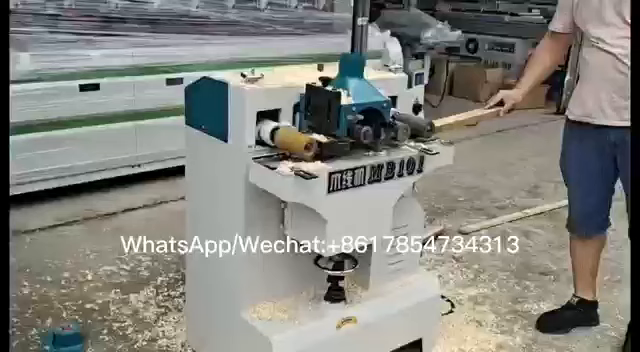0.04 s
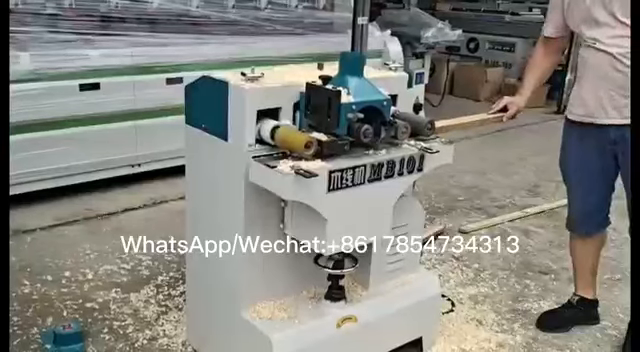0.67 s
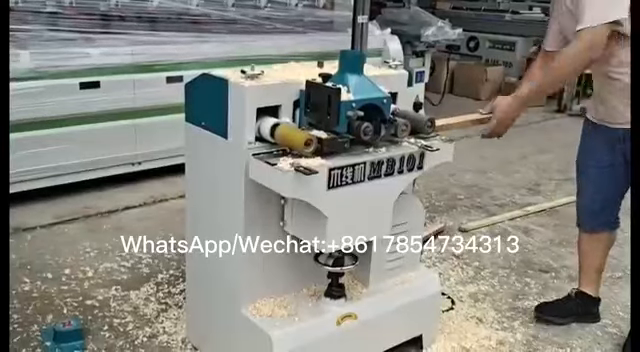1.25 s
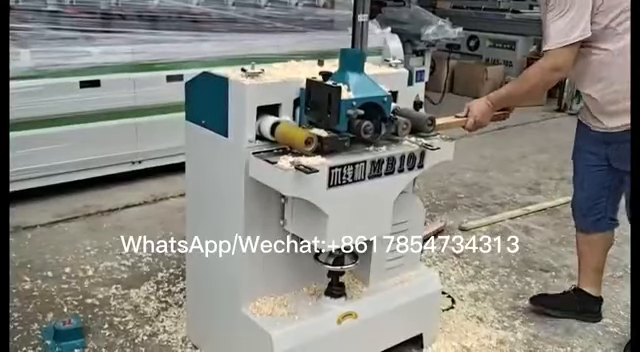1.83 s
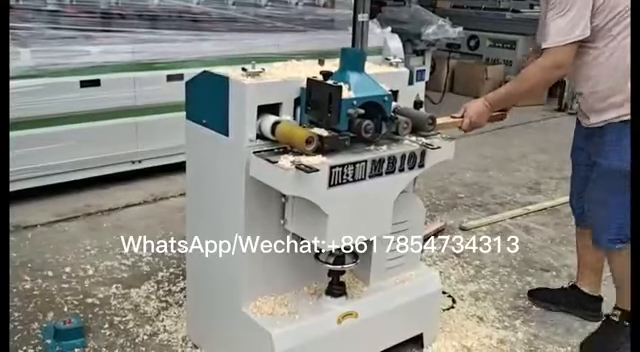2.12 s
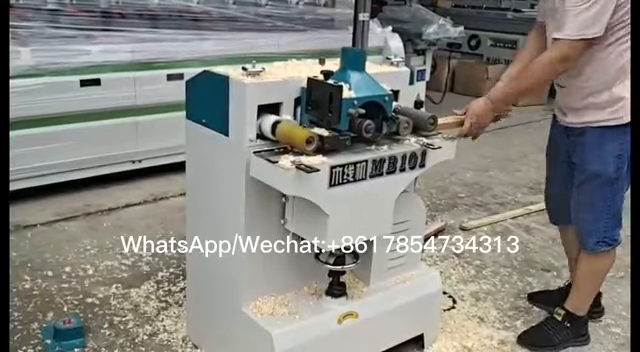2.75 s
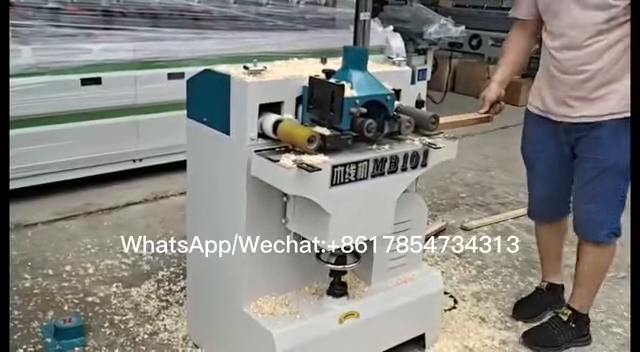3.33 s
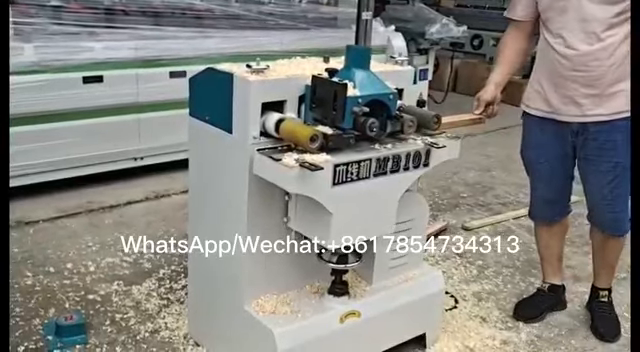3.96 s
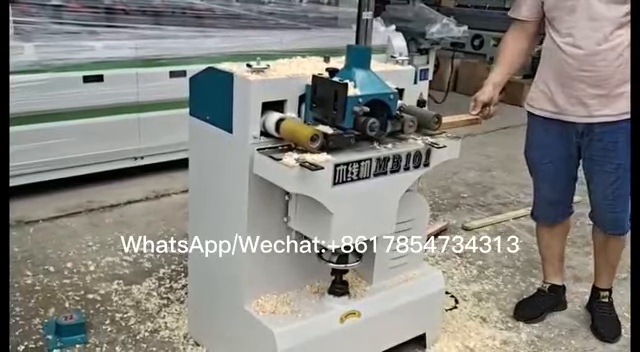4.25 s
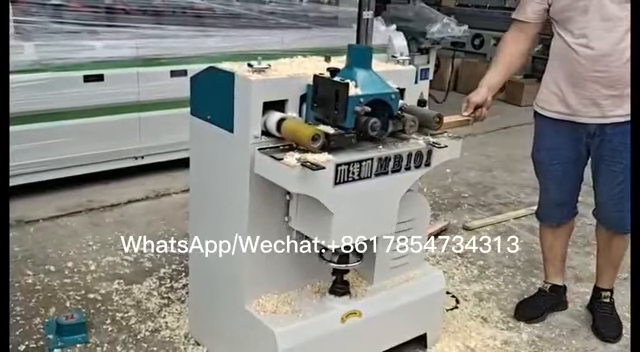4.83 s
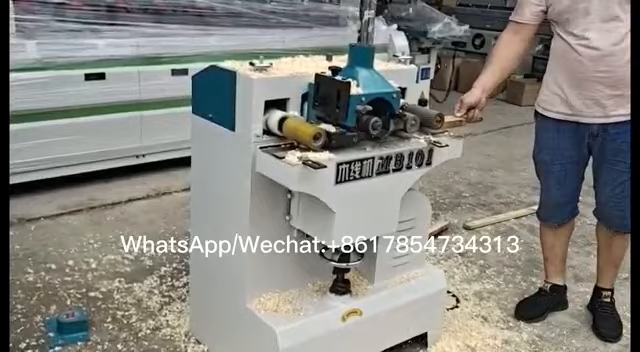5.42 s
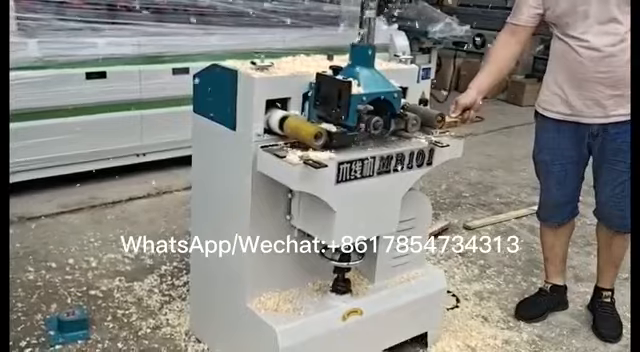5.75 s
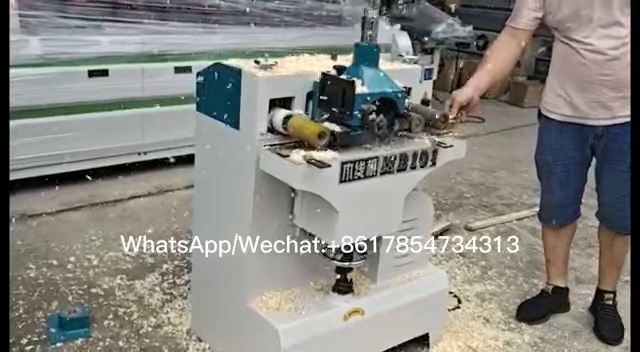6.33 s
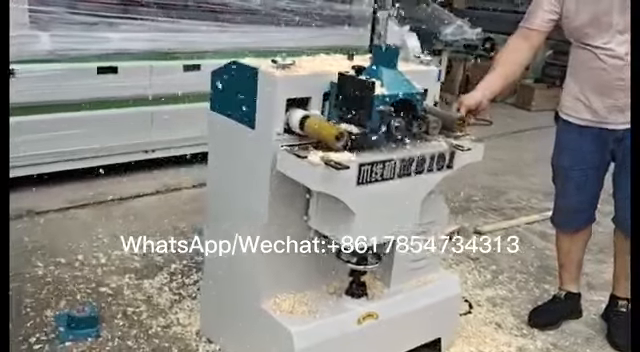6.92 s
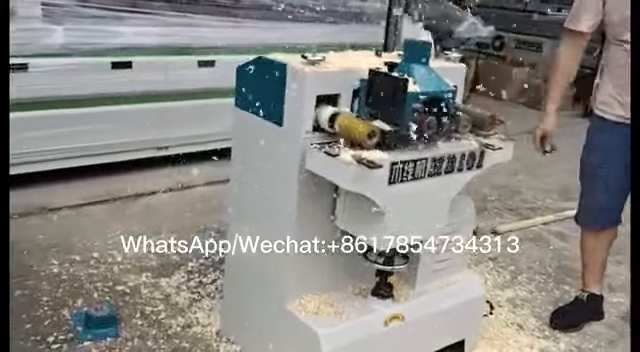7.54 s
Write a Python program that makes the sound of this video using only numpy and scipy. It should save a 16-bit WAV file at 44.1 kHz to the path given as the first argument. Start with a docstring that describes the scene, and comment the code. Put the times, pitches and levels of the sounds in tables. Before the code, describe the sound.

A wood planer idles with a siren-like hum, then squeals and whines roughly as a wooden strip is cut, chips hissing.

```python
"""Wood planer taking a cut

A four-knife planer idles in a workshop, its cutter block chopping the air into a siren hum over
motor fan, bearings and rushing air. At about five seconds a wooden strip meets the knives: a short
squeal, the shaft sags, and the cut settles to a rough whine with hissing, pattering chips."""
import sys
import numpy as np
from scipy import signal
from scipy.fft import rfft, irfft
from scipy.io import wavfile
from scipy.ndimage import uniform_filter1d

SR = 44100
rng = np.random.default_rng(int(sys.argv[2]) if len(sys.argv) > 2 else 0)


def wav_out(sig):
    """Save sig, one row per channel (or a flat mono array), as 16-bit PCM at SR to the path in sys.argv[1]."""
    wavfile.write(sys.argv[1], SR, np.round(np.clip(np.atleast_2d(sig).T, -1, 1) * 32767).astype(np.int16))


N = 338688
T = np.arange(N) / SR

# cutter shaft, sagging under load: t/s, speed/(turns/s)
SHAFT_SPEED = [(0, 104.13), (4.98, 104.13), (5.16, 102.9), (5.4, 102.12), (5.7, 101.88), (6.4, 102.0)]
# rides for the knife-pass hum and its octave, which honks as the full cut begins: t/s, level/dB
HUM_RIDE = [(.4, -32), (4.1, -30), (4.85, -35), (5.4, -29.5), (5.95, -30), (6.45, -36), (6.97, -26.5),
            (7.3, -30.5), (7.66, -37.5)]
OCTAVE_RIDE = [(.3, -41.5), (1.8, -36.5), (2.6, -38.5), (4.33, -34.5), (4.8, -42.5), (4.96, -34.5),
               (5.03, -50), (5.15, -35.5), (5.3, -37), (5.48, -24), (5.68, -38.5), (5.85, -30.5),
               (7.65, -32)]
# rides for the fan tone, which sinks under load, and for the rumble: t/s, level/dB
FAN_RIDE = [(.5, -41), (1.75, -40), (2.45, -35.5), (4.4, -34.5), (5.15, -39.5)]
RUMBLE_RIDE = [(.3, -44.5), (.65, -44), (2.2, -42.5), (3.0, -40.5), (3.9, -40), (4.85, -39.5),
               (5.35, -44.5), (5.75, -40.5), (6.05, -45), (6.3, -42), (7.6, -43.5)]
# faint tones of motor, belt and bearings: f/Hz, settled level/dB, width/Hz
WHIRR_TONES = [(104.4, -57.5, 2.5), (168.4, -44.5, 10), (224, -58, 8.9), (303.8, -51.5, 27),
               (1240, -56.5, 1.6), (1402, -60, 16), (1468, -59.5, 12), (1680, -61.5, 2.5),
               (1851, -58.5, 48), (3720, -59, 49), (4065, -58, 110), (7470, -60, 48)]
# resonances the strip catches: t/s, length/s, f/Hz, level/dB
STRIP_RESONANCES = [(4.842, 0.13, 2915, -46), (5.05, 0.15, 1240, -35), (5.066, 0.28, 308, -36),
                    (5.336, 0.19, 1633, -33), (5.593, 0.21, 918, -32.5), (5.898, 0.098, 306, -34),
                    (5.92, 0.21, 918, -40), (6.847, 0.75, 306, -44), (6.917, 0.96, 918, -40.5),
                    (7.295, 0.23, 918, -33), (7.618, 0.11, 306, -26.5)]
# partials of the squeal: shaft order, relative level at first touch/dB, once dug in/dB
SQUEAL_PARTIALS = [(6, -58, -48), (10, -56, -39), (11, -52, -39), (12, -50, -44), (13, -54, -42),
                   (16, -51, -37.5), (20, -39.5, -33.5), (22, -41, -52), (24, -45, -39), (28, -32, -31.5),
                   (32, -36, -30.5), (36, -47, -40), (40, -37.5, -32), (44, -36, -37), (48, -44, -31.5),
                   (52, -46, -36.5), (56, -44, -43), (60, -45, -46), (64, -49, -41.5), (68, -41.5, -45),
                   (72, -46, -35.5), (76, -43, -42), (80, -57, -44), (84, -49, -45), (88, -55, -47),
                   (92, -55, -52)]
# partials that stand out of the whine: shaft order, relative level early in the feed/dB, late/dB
WHINE_PARTIALS = [(6, -50, -51), (10, -39, -42), (12, -41, -39), (13, -44, -52), (14, -51, -42),
                  (15, -58, -50), (16, -38, -45), (17, -50, -50), (18, -45, -57), (21, -54, -70),
                  (22, -53, -75), (24, -50, -44), (25, -54, -47), (26, -65, -50), (27, -50, -45),
                  (28, -42.5, -44), (30, -58, -68), (31, -55, -49), (32, -52, -48), (33, -53, -49),
                  (34, -43, -45), (36, -44, -40), (38, -52, -48), (41, -49, -52), (48, -50, -50),
                  (52, -51, -53)]
# larger chips striking the hood: t/s, relative level/dB
HOOD_HITS = [(5.539, -18), (5.5863, -18.5), (5.699, -20), (5.8916, -21), (7.281, -21), (7.431, -21),
             (7.505, -23)]
# EQ curves of the noise layers; the late rasp is hollow near 2200 Hz: f/Hz, relative level/dB
AIR_EQ = [(100, -37), (220, 0.5), (290, -1.5), (420, 7.5), (570, -6), (800, 2), (1050, 1), (1450, -10.5),
          (2050, -16.5), (3000, -12.5), (5000, -14.5), (6100, -21), (7600, -23.5), (8300, -40.5)]
RUMBLE_EQ = [(20, -40), (40, -30), (80, -22), (105, -7.5), (135, 2), (168, -6.5), (195, -10.5),
             (300, -31.5), (600, -71.5)]
CHIP_EQ = [(3000, -22), (4100, 2), (5200, 2.5), (5900, -1), (6700, 2.5), (7350, 7.5), (7750, -1),
           (8100, -11), (9000, -10.5), (9500, -30)]
EARLY_RASP_EQ = [(1000, -17), (1600, 5), (1900, 2), (2150, 2), (2600, 5), (3500, 6.5), (4000, 0),
                 (5000, -42)]
LATE_RASP_EQ = [(1000, -19.5), (1600, 8), (1950, -3.5), (2200, -26.5), (2480, 9.5), (2800, 5.5), (3050, -3),
                (3450, 10.5), (4000, 2), (5000, -31)]
WOOD_EQ = [(150, -32), (300, -8.5), (600, -3), (900, 5.5), (1300, 1.5), (1800, -2), (2400, -47.5)]
# how alike left and right are: f/Hz, correlation (0-1)
STEREO_LIKENESS = [(25, .99), (60, .9998), (205, .9998), (260, .995), (320, .975), (400, .997), (460, .995),
                   (590, .68), (720, .92), (820, .985), (1000, .95), (1400, .55), (2100, .76), (3800, .55),
                   (4500, .33), (6100, .35), (6500, .78), (7400, .82), (8000, .05)]
# pan across the spectrum: f/Hz, level of left over right/dB
STEREO_PAN = [(450, 0), (600, 1.5), (800, .5), (1050, .3), (1400, 5), (2000, 0), (3200, -3), (4400, -.7),
              (6100, -7), (6700, -5), (7200, -2.5), (7900, .5)]
# how far left leads right: f/Hz, phase/rad
STEREO_LEAD = [(2400, 0), (3600, .55), (4000, .2), (4400, .9), (4900, .4), (5400, 1.1), (6000, 0)]

START_S = .163  # the sound opens
CONTACT_S, GRAZE_END_S = 4.912, 5.416  # the strip grazes the knives, then slides into the full cut
LATE_S = 6.84  # the strip's ring shifts and the cut grows louder


def amp(db):
    """Decibels to gain."""
    return 10 ** (np.asarray(db) / 20)


def unit(x):
    """Scales to rms 1."""
    return x / np.sqrt(np.mean(abs(x) ** 2) + 1e-20)


def ramp(start_s, length_s):
    """A straight fade from 0 to 1."""
    return np.clip((T - start_s) / length_s, 0, 1)


def rise(start_s, time_s):
    """An exponential attack from 0 towards 1."""
    return 1 - np.exp(-np.maximum(T - start_s, 0) / time_s)


def held(start_s, length_s, edge_s):
    """Attack, hold and release."""
    attack_s = start_s - edge_s / 2
    return ramp(attack_s, edge_s) * (1 - ramp(attack_s + length_s, edge_s))


def automation(points):
    """A timed table as a control signal."""
    return np.interp(T, *np.transpose(points))


def spectrum(points, hz):
    """Reads a table on a log-frequency axis."""
    f, value = np.transpose(points)
    return np.interp(np.log(hz + 1), np.log(f), value)


def drift(hz):
    """Smooth random wander of rms about 1, rolling off above hz."""
    size, control_rate = 4096, 500
    f = np.fft.rfftfreq(size, 1 / control_rate)
    slow = unit(irfft(rfft(rng.standard_normal(size)) / (1 + (f / hz) ** 2)))
    return np.interp(T, np.arange(size) / control_rate, slow)


def noise():
    """White noise, unrelated left and right."""
    return rng.standard_normal((2, N))


def colour(x, eq):
    """Shapes x with an EQ curve; rms 1."""
    gain = amp(spectrum(eq, np.fft.rfftfreq(N, 1 / SR)))
    return unit(irfft(rfft(x) * gain, N))


def patchy(x, depth_db):
    """Shifts a noise's colour in patches a few hundred hertz wide and a tenth of a second long."""
    frames = signal.stft(x, nperseg=1024)[2]
    patches = rng.standard_normal(frames.shape[1:])
    for _ in range(2):
        patches = uniform_filter1d(uniform_filter1d(patches, size=4, axis=0), size=8, axis=1)
    return unit(signal.istft(frames * amp(depth_db * unit(patches)))[1][:, :N])


def tone(cycles, rough, width_hz):
    """A part steady, part wandering tone of rms 1, its two channels a quarter cycle apart."""
    wander = rough * (drift(width_hz) + 1j * drift(width_hz)) / np.sqrt(2)
    carrier = np.exp(2j * np.pi * (cycles + rng.random())) * np.sqrt(2 / (1 + rough ** 2))
    left = (carrier * (1 + wander)).real
    right = rng.choice([-1, 1]) * (carrier * (1 + wander.conj())).imag
    return np.array([left, right])


def cutter_siren(turns):
    """Four knives chop the air into a hum and its octave."""
    hum = amp(automation(HUM_RIDE)) * tone(4 * turns, rough=.013, width_hz=15)
    octave = amp(automation(OCTAVE_RIDE)) * tone(8 * turns, rough=.2, width_hz=5)
    return hum + octave


def motor_fan(hz=372.4):
    """The fan's tone sits just below the knife hum and beats against it."""
    return amp(automation(FAN_RIDE)) * tone(hz * T, rough=.25, width_hz=7)


def drive_whirr():
    """Motor, belt and bearings add a bed of faint, wavering tones."""
    return sum(amp(db) * tone(hz * T, rough=1.12, width_hz=width / 2) for hz, db, width in WHIRR_TONES)


def air_rush():
    """Air rushes through the machine with a light flutter."""
    fluttering = patchy(noise(), depth_db=1.5) * amp(drift(40))
    return colour(fluttering, AIR_EQ) * amp(-35)


def frame_rumble():
    """Motor and frame rumble unsteadily in the low end."""
    return colour(noise(), RUMBLE_EQ) * amp(automation(RUMBLE_RIDE) + 1.3 * drift(7))


def strip_howls(turns, likeness=.75):
    """The strip catches a resonance and growls or howls briefly on the nearest shaft order."""
    speed = automation(SHAFT_SPEED)
    howls = 0
    for start_s, length_s, hz, db in STRIP_RESONANCES:
        order = np.round(hz / np.interp(start_s, T, speed))
        envelope = amp(db) * held(start_s, length_s, edge_s=.051)
        howls += envelope * tone(order * turns, rough=.58, width_hz=12)
    left, other = howls
    return np.array([left, likeness * left + np.sqrt(1 - likeness ** 2) * other])


def graze_squeal(turns):
    """Knives graze the strip's end: a thin scream fills out as they dig in, then dies treble first."""
    dug_in = ramp(5.02, .22)
    chatter = turns + dug_in * .001 * drift(70)  # the strip shakes, so the blows land unevenly
    scream = 0
    for order, touch_db, dug_db in SQUEAL_PARTIALS:
        khz = order * SHAFT_SPEED[-1][1] / 1000
        release = 1 - ramp(5.43 - .014 * khz, .11)
        level = amp(touch_db) * (1 - dug_in) + amp(dug_db) * dug_in
        scream += level * release * tone(order * chatter, rough=.5, width_hz=26 + .3 * order)
    return scream * amp(.4) * rise(CONTACT_S, .022)


def workshop_echo(x, wet_db=-10, t60_s=.5, reflections_per_s=2000):
    """The shop holds on to the pitch of a moment ago, so falling partials broaden and beat."""
    reflections = noise() * (rng.random((2, N)) < reflections_per_s / SR)
    tail = reflections * (T > .004) * amp(-60 * T / t60_s)
    echo = signal.fftconvolve(x, unit(tail) / np.sqrt(N), axes=1)[:, :N]
    return (x + amp(wet_db) * echo) / np.hypot(1, amp(wet_db))


def tearing(turn_likeness):
    """Each turn tears the wood much like the last: noise combed at the loaded shaft rate."""
    one_turn_delay = np.exp(-2j * np.pi * np.fft.rfftfreq(N, 1 / SR) / SHAFT_SPEED[-1][1])
    return irfft(rfft(noise()) / (1 - turn_likeness * one_turn_delay), N)


def knife_pulses(turns):
    """Four unequal knives make the level pulse four times a turn."""
    angle = 2 * np.pi * turns
    return 1 + .1 * np.cos(4 * angle) + .08 * np.cos(2 * angle) + .07 * np.cos(angle)


def chip_hiss(turns, graze, late, chips_per_s=250):
    """Fine spray hisses off the knives and loose chips patter on the hood; grazing throws fewer."""
    spray = patchy(tearing(turn_likeness=.54), depth_db=2) * knife_pulses(turns) * amp(1.6 * drift(40))
    impacts = (rng.random((2, N)) < chips_per_s / SR) * noise()
    patter = impacts * amp(3 * np.minimum(rng.exponential(1, (2, N)), 3))
    first_chips = held(5.42, .22, edge_s=.16)  # thickest as the full cut begins
    level_db = -37 - 4.5 * graze + 3.5 * first_chips + late
    return colour(spray + .55 * unit(patter), CHIP_EQ) * amp(level_db) * rise(CONTACT_S, .036)


def cut_whine(turns, late, ease):
    """Unequal bites sound every shaft order; as the cut eases, the knife-pass harmonics dip least."""
    prominent = {order: levels for order, *levels in WHINE_PARTIALS}
    whine = 0
    for order in range(6, 54):
        early_db, late_db = prominent.get(order, (-59, -59))
        level = amp(early_db) * (1 - late) + amp(late_db) * late
        dip_db = -1.5 if order % 4 == 0 else -7
        dip = 1 + ease * (amp(dip_db) - 1)
        whine += level * dip * tone(order * turns, rough=.26, width_hz=2 + .2 * order)
    return whine * amp(-1.1)


def fibre_rasp(turns, late, ease):
    """Fibres tear at each knife: fierce at the first bite, settling, then swelling late in the feed."""
    fibres = patchy(tearing(turn_likeness=.66), depth_db=2) * knife_pulses(turns)
    fibres *= amp(drift(35))  # hard and soft wood passes under the knives
    rasp = colour(fibres, EARLY_RASP_EQ) * (1 - late) + colour(fibres, LATE_RASP_EQ) * late
    bite = held(5.03, .12, edge_s=.036)
    scraping = 1 - ramp(GRAZE_END_S, .37)
    swell = ramp(LATE_S, .88)
    return rasp * amp(-36.5 + 3.5 * bite + 5 * scraping - 3.5 * ease + 5.5 * swell)


def wood_body(graze):
    """The body of the strip fills in the mids just after contact, loudest while the knives graze."""
    body = colour(tearing(turn_likeness=.45), WOOD_EQ)
    return body * amp(-37.5 + 4 * graze) * rise(CONTACT_S + .14, .051)


def hood_ticks(decay_s=.0066):
    """Larger chips hit the hood, each a short, bright crack."""
    envelope = sum(amp(db - 7) * (T >= s) * (1 - rise(s, decay_s)) for s, db in HOOD_HITS)
    return colour(noise(), CHIP_EQ) * envelope


def stereo_image(pair):
    """Near mono in the bass, wider and leaning right in the treble."""
    hz = np.fft.rfftfreq(N, 1 / SR)
    likeness = spectrum(STEREO_LIKENESS, hz)
    pan = amp(spectrum(STEREO_PAN, hz) / 2)
    lead = spectrum(STEREO_LEAD, hz)
    left, other = rfft(pair)
    right = (likeness * left + np.sqrt(1 - likeness ** 2) * other) * np.exp(-1j * lead)
    mono_gain = np.sqrt(pan ** 2 + pan ** -2 + 2 * likeness * np.cos(lead)) / 2
    return irfft(np.array([left * pan, right / pan]) / mono_gain, N)


def scene():
    """The idling machine with the cut layered on top; under load the shaft speed trembles."""
    load = rise(CONTACT_S + .053, .047)
    turns = np.cumsum(automation(SHAFT_SPEED) + .1 * load * drift(6)) / SR
    graze = 1 - ramp(GRAZE_END_S, .062)
    ease = held(5.62, .273, edge_s=.044)  # the cut lets up briefly after the bite
    late = ramp(LATE_S, .1)
    opening_swell = amp(-4.5 * (1 - rise(START_S, 1.6)))
    machine = cutter_siren(turns) + motor_fan()
    machine += (drive_whirr() + air_rush()) * opening_swell + frame_rumble()
    cut = workshop_echo(graze_squeal(turns)) + chip_hiss(turns, graze, late)
    cut += load * (cut_whine(turns, late, ease) + fibre_rasp(turns, late, ease))
    cut += wood_body(graze) + hood_ticks()
    return stereo_image(machine + cut) + strip_howls(turns)  # the howls keep their own width


def record(dry):
    """An abrupt entry, a quick fade up and a steep high cut."""
    gate = ramp(START_S - .001, .004)
    fade_up = amp(-8.5 * (1 - rise(START_S, .11)))
    high_cut = signal.firwin(511, cutoff=9700, window=("kaiser", 9), fs=SR)
    return signal.oaconvolve(dry * gate * fade_up, high_cut[None], "same")


dry = scene()
out = record(dry)
wav_out(out)
```